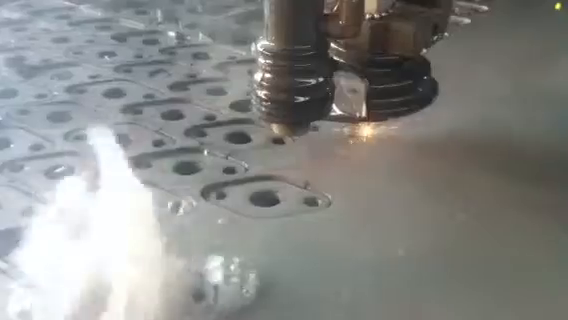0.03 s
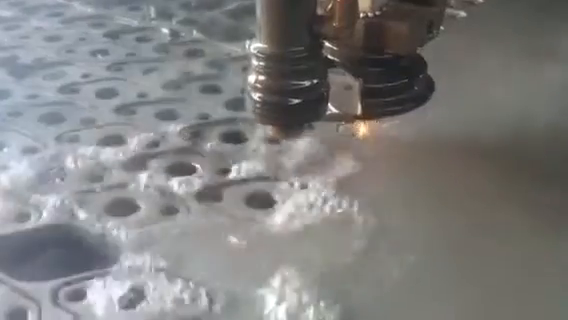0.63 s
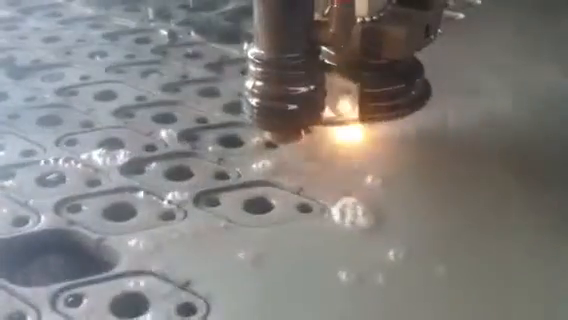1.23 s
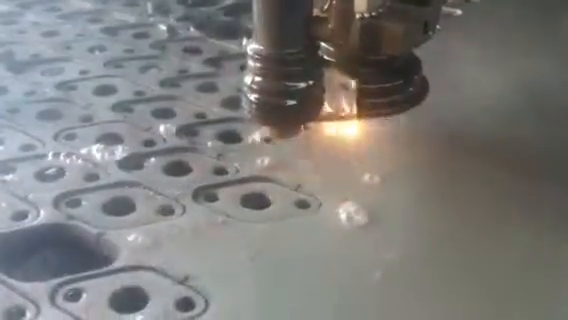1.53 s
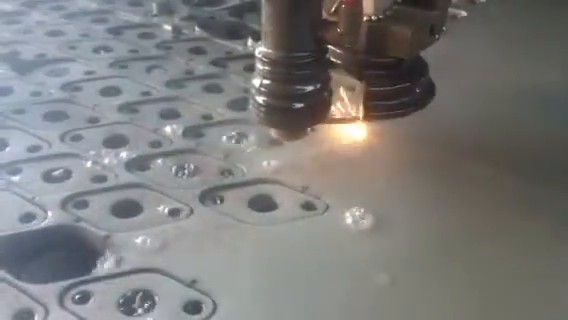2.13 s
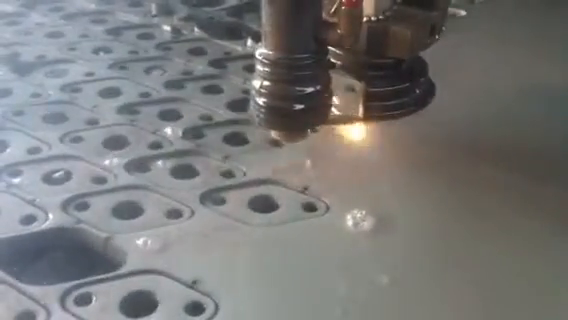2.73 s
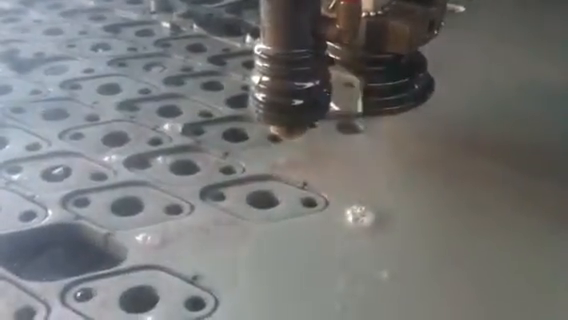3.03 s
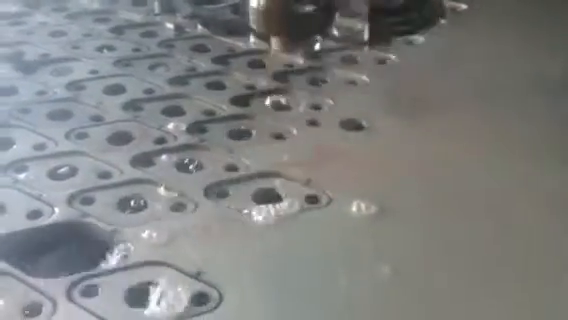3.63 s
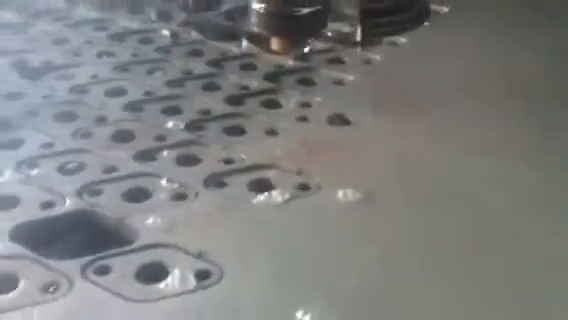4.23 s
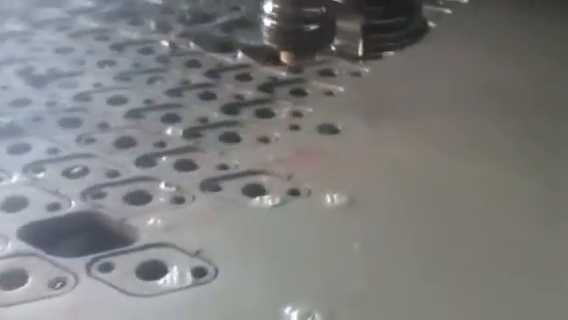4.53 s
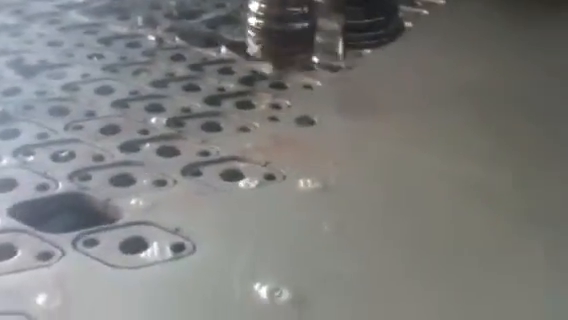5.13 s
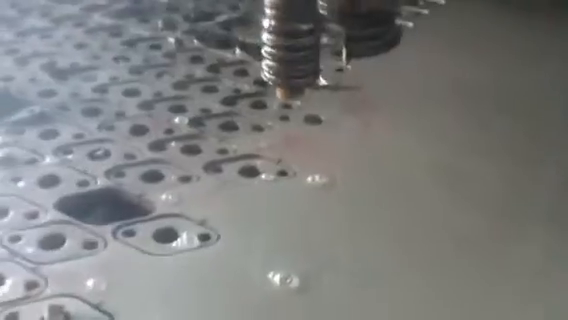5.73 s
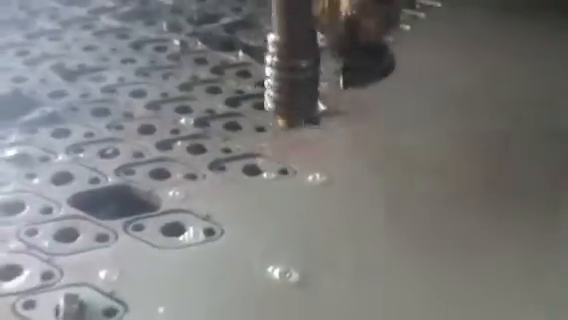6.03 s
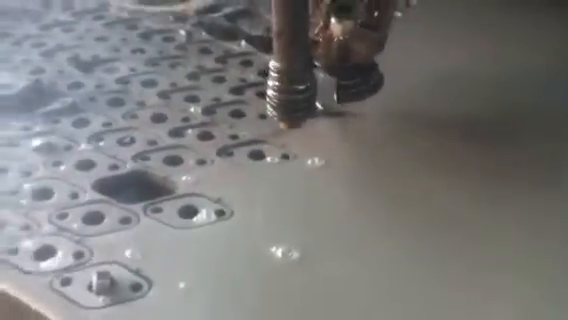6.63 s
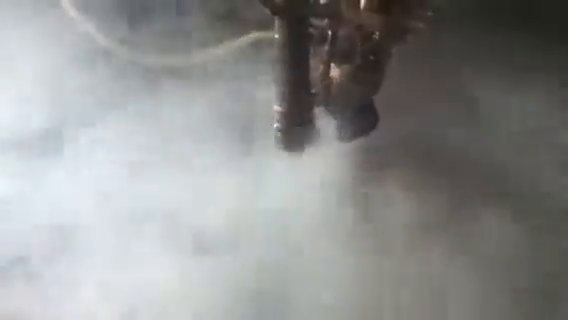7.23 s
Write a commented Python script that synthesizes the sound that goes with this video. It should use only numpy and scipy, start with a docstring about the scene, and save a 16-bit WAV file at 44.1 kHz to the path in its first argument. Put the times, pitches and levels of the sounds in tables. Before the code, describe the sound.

A waterjet hisses harshly through sheet steel while water churns and gurgles around it, heard up close in a workshop. After about three seconds it stops, leaving a much quieter machine hum, soft gas puffs and high whining servos. The cutting head lands with a sharp metallic knock, followed by lighter clunks. Near the end a valve clacks and the jet restarts with a loud, spraying blast.

```python
"""In a workshop, close to one microphone, a cutting jet works through a steel sheet on a water table.
Turbulent gas hisses in the nozzle; collapsing bubbles crackle in the kerf and churn the water.
The jet shuts off, gas puffs out, and the head travels on whining servos over the hum of motors and fans.
It knocks down on the sheet, a valve clacks, and the jet pierces a new hole, throwing water back."""
import sys
import numpy as np
from scipy import signal
from scipy.fft import rfft, irfft
from scipy.io import wavfile
from scipy.ndimage import uniform_filter1d, map_coordinates

SR = 44100
rng = np.random.default_rng(int(sys.argv[2]) if len(sys.argv) > 2 else 0)


def generate_wav(signal):
    """Clip the signal to [-1, 1] and save it as 16-bit WAV at the path in sys.argv[1]."""
    frames = np.transpose(np.atleast_2d(signal))
    scaled = np.clip(frames, -1, 1) * 32767
    pcm = np.round(scaled).astype(np.int16)
    wavfile.write(sys.argv[1], SR, pcm)


N = 329427
T = np.arange(N) / SR
TOP_HZ = 15750  # upper band edge


def undb(db):
    """Amplitude ratio of a level in decibels."""
    return 10 ** (np.asarray(db) / 20)

def unit(x):
    """Normalisation to rms 1."""
    return x / np.sqrt(np.mean(x ** 2))

def curves(rows):
    """Linear interpolation of each column over the times in the first."""
    times, *columns = np.transpose(rows)
    return [np.interp(T, times, column) for column in columns]

def noise():
    """Gaussian white noise."""
    return rng.standard_normal(N)

def walk(rate):
    """Smooth random modulation of rms 1, with about `rate` new values a second."""
    step = max(int(SR / rate), 1)
    held = np.repeat(rng.standard_normal(N // step + 1), step)
    return unit(uniform_filter1d(held, step)[:N])

def colour(x, points, size=4096):
    """Minimum-phase filter through (frequency [Hz], level [dB]) points, falling away above TOP_HZ."""
    hz, db = np.transpose(points)
    f = np.fft.rfftfreq(size, 1 / SR) + 1
    gain = undb(np.interp(np.log(f), np.log(hz), db) - np.clip((f - TOP_HZ) / 20, 0, 40))
    cepstrum = irfft(np.log(gain))[:size // 2]
    cepstrum[1:] *= 2  # folding the cepstrum makes the response causal
    return signal.oaconvolve(x, irfft(np.exp(rfft(cepstrum, size))))[:N]

def split(x, hz, order):
    """Crossover: the bands below and above a frequency, each at rms 1."""
    filters = [signal.butter(order, hz, kind, fs=SR, output="sos") for kind in ("low", "high")]
    return [unit(signal.sosfilt(sos, x)) for sos in filters]

def pops(rate, spread_db):
    """Poisson process of pressure spikes, mostly small, a few large."""
    sizes = undb(spread_db * np.minimum(rng.exponential(size=N), 5))
    return unit((rng.random(N) < rate / SR) * sizes * np.sign(noise()))

def fade(start, decay):
    """Sudden onset and exponential decay."""
    return (T >= start) * np.exp(-np.clip((T - start) / decay, 0, 50))

def swells(rows, attack_s, release_s):
    """Power sum of (start [s], length [s], level [dB]) envelopes that rise, hold and decay."""
    power = 0
    for start, length, db in rows:
        rise = np.clip((T - start) / attack_s, 0, 1)
        fall = np.exp(-np.clip((T - start - length) / release_s, 0, 50))
        power += (undb(db) * rise * fall) ** 2
    return np.sqrt(power)

def tones(partials, waver_db, drift_hz):
    """Sinusoids under slow random amplitude and frequency modulation."""
    out = 0
    for hz, db in partials:
        amplitude = np.sqrt(2) * undb(db + waver_db * walk(6))
        phase = 2 * np.pi * np.cumsum(hz + drift_hz * walk(5)) / SR
        out += amplitude * np.sin(phase)
    return out

def resonances(rows, flicker_db, drift):
    """Randomly driven resonances give narrow noise bands, each wandering in pitch on its own."""
    out = 0
    for hz, width, db in rows:
        phase = 2 * np.pi * np.cumsum(hz * (1 + drift * walk(7))) / SR
        amplitude = undb(db + flicker_db * walk(22))
        out += amplitude * (walk(width) * np.cos(phase) + walk(width) * np.sin(phase))
    return out

def ring(modes, start, contact_s=.0007):
    """Damped modes of a body struck at `start`; neighbouring modes swing in antiphase."""
    t = T[:SR // 2]
    swings = [undb(db - 60 * t / t60) * np.sin(2 * np.pi * hz * t) for hz, db, t60 in modes]
    response = (sum(swings[::2]) - sum(swings[1::2])) * (1 - np.exp(-t / contact_s))
    return np.pad(response, (int(start * SR), N))[:N]

def workshop(x, t60, wet_db):
    """Reverberation: reflections from distant walls add a diffuse, exponentially decaying tail."""
    # spectrum of the tail: (frequency [Hz], level [dB])
    room_spectrum = [(60, -13), (300, -19), (1500, -2.5), (2800, -11.5), (4200, 7), (9000, 12.5),
                     (13000, 5.5), (16000, -1)]
    tail = colour(noise() * fade(.012, t60 / np.log(1000)), room_spectrum)[:SR]
    return x + undb(wet_db) * signal.oaconvolve(x, tail / np.linalg.norm(tail))[:N]

def extraction():
    """Broadband flow noise of fans fills the workshop with a low, even rush."""
    # fan noise: (frequency [Hz], level [dB])
    fan_spectrum = [(18, -78), (30, -57), (98, -18.5), (220, -5.5), (271, -16), (309, -5), (564, -17),
                    (1570, -19), (2790, -32), (3920, -25), (6110, -30), (7540, -32.5), (8160, -29),
                    (9800, -33.5), (15700, -40.5)]
    return unit(colour(noise(), fan_spectrum)) * undb(-47.5 + 0.44 * walk(8.7))

def machine():
    """Periodic forces make motors hum, servos whine and the lift drone; rolling drives add noise."""
    # motor and fan tones: (frequency [Hz], level [dB])
    hum_partials = [(146, -15.5), (193.8, -12), (224.2, -2.5), (299, -13), (312.2, -14.5), (448.4, -19),
                    (672.6, -22), (886, -22), (897, -30)]
    # their joint gain: (time [s], level [dB])
    hum_levels = [(3.1, -51), (3.45, -45.5), (3.6, -42), (4.0, -44.5), (4.6, -41), (6.2, -40.5),
                  (6.78, -39), (6.86, -48)]
    hum = tones(hum_partials, waver_db=1.1, drift_hz=0.675) * undb(curves(hum_levels)[0])

    # moves of the head: (start [s], length [s], rolling level [dB], whine level [dB])
    moves = np.array([(3.214, 0.44, -50, -76), (4.25, 1.1, -54.5, -67.5), (5.115, 0.32, -46.5, -63),
                      (5.603, 1.3, -50.5, -61), (5.965, 0.25, -44.5, -75)])
    roll_gain = swells(moves[:, [0, 1, 2]], attack_s=0.07, release_s=0.15)
    whine_gain = swells(moves[:, [0, 1, 3]], attack_s=0.07, release_s=0.15)
    # rolling noise: (frequency [Hz], level [dB])
    drive_spectrum = [(100, -31), (300, -1), (700, -3), (1100, -6), (1700, -4), (2200, -10), (2700, -17),
                      (5300, -22), (9000, -27), (15000, -39)]
    # resonances of the gearing: (frequency [Hz], bandwidth [Hz], level [dB])
    gear_bands = [(1770, 120, -16.5), (3430, 130, -22.5), (3850, 150, -17.5), (4100, 150, -22.5),
                  (4840, 130, -19.5), (5970, 200, -20)]
    rolling = unit(colour(noise(), drive_spectrum)) + resonances(gear_bands, flicker_db=1.5, drift=.005)
    idle_gain = undb(-61.5)
    rolling *= np.hypot(roll_gain, idle_gain) * undb(0.52 * walk(45))

    # servo carrier tone: (time [s], level [dB])
    carrier_levels = [(3.45, -82), (3.75, -64), (4.9, -60), (6.2, -58), (6.75, -54)]
    carrier = tones([(8000, 0)], waver_db=1.5, drift_hz=.3) * undb(curves(carrier_levels)[0])
    # servo whine: (frequency [Hz], level [dB])
    whine_partials = [(5916, -6), (5997, 0), (6072, -5), (6848, -12)]
    whine = tones(whine_partials, waver_db=1.5, drift_hz=0.63) * whine_gain
    lift = tones([(103, -52.0)], waver_db=0.0, drift_hz=0.75) * np.exp(-((T - 6.38) / 0.14) ** 2)
    return hum + rolling + carrier + whine + lift

def puffs():
    """Soft turbulent noise of gas alone blowing through the idle nozzle."""
    # gas noise: (frequency [Hz], level [dB])
    puff_spectrum = [(1470, -73), (2500, -40), (2960, -22), (3350, -7), (4120, -2.5), (6240, -14.5),
                     (7220, -9), (8290, -14), (9670, -18), (11100, -8.5), (12100, -17), (13700, -11),
                     (15700, -22)]
    # releases of gas: (start [s], length [s], level [dB])
    puff_events = [(3.245, 0.093, -40.5), (3.35, .085, -42), (5.115, .025, -41), (6.67, 0.056, -46)]
    envelope = swells(puff_events, attack_s=0.035, release_s=0.055)
    return unit(colour(noise(), puff_spectrum)) * envelope * undb(0.98 * walk(37))

def knocks():
    """Impacts crack, thud and excite the modes of the head; touching down also rings the sheet."""
    # blows of the head and its valve: (time [s], level [dB], crack decay [s],
    # relative crack level [dB], crack cutoff [Hz], relative thud level [dB])
    blows = [(5.2019, -19, 0.0081, 0.5, 15000, -24), (5.2067, -27, 0.0026, 3, 15000, -20),
             (5.2193, -30, 0.0045, 13, 15000, -16), (6.139, -43, .01, 6, 8000, -10),
             (6.2445, -32.5, 0.0051, 10, 7500, 4), (6.268, -39.5, .007, 8, 5000, -1),
             (6.7683, -21.5, 0.0055, 8.5, 12000, -17), (6.786, -34, 0.0075, 5, 9000, 9),
             (6.7965, -34, 0.0033, 12, 12000, -7)]
    # modes of the head and of the sheet: (frequency [Hz], level [dB], t60 [s])
    head_modes = [(1140, -22, .04), (1377, -2, 0.073), (1510, -5, 0.076), (1815, -1, 0.081),
                  (2480, -15, .04), (3810, 0.5, 0.032), (4660, -15, .02), (6600, -5, 0.051),
                  (8603, -14, 0.022)]
    sheet_modes = [(620, 1, 0.11), (1360, -7, 0.16)]
    # bright and dull parts of the contact noise: (frequency [Hz], level [dB])
    crack_spectrum = [(150, -42), (700, -18), (1300, 13), (2700, -3.5), (4000, -0.5), (7000, 0),
                      (11000, -5.5), (15000, 0)]
    thud_spectrum = [(40, -16), (150, -3), (470, -3), (800, -12), (2000, -32)]
    crack = unit(colour(noise(), crack_spectrum))
    thud = unit(colour(noise(), thud_spectrum))
    out = 0
    for start, db, decay, crack_db, cutoff_hz, thud_db in blows:
        dulled = signal.sosfilt(signal.butter(2, min(cutoff_hz, TOP_HZ), fs=SR, output="sos"), crack)
        contact = undb(crack_db) * dulled * fade(start, decay)
        contact += undb(thud_db) * thud * fade(start, decay=0.0059)
        out += undb(db) * (undb(-1.5) * ring(head_modes, start) + contact)
    return out + undb(-25.5) * ring(sheet_modes, start=5.223)

def bursts(rows, spectrum):
    """Noise with droplet impulses, under envelopes that peak after one swell time and decay."""
    envelope = sum(undb(db) * np.e * (T - start) / swell * fade(start, swell)
                   for start, db, swell in rows)
    return envelope * unit(colour(noise() + 0.39 * pops(rate=900, spread_db=1.5), spectrum))

def splashes():
    """Noise transients: large gas bubbles burst out of the water and the kerf spits spray."""
    # bursting bubbles and spits of spray: (time [s], level [dB], swell time [s])
    gulps = [(.16, -20.5, 0.0094), (.355, -21, 0.013), (.648, -20.5, 0.013), (.848, -21, 0.011),
             (1.62, -18, 0.0048), (1.655, -17.5, 0.0043), (6.884, -22, .005), (7.168, -21, .005)]
    spits = [(.18, -19, 0.011), (.296, -23, .008), (.372, -22, .006), (.79, -22, 0.011), (.858, -22, 0.008),
             (1.041, -18, 0.0027), (6.845, -15.5, 0.014), (6.965, -19, 0.026), (7.035, -21, .018)]
    # their spectra: (frequency [Hz], level [dB])
    gulp_spectrum = [(40, -37), (110, -0.5), (250, 1), (500, -4), (1500, -9), (4000, -13), (9000, -28)]
    spray_spectrum = [(400, -19), (1200, 0), (3500, -0.5), (6000, -0.5), (9000, -3), (15000, -23)]
    return bursts(gulps, gulp_spectrum) + bursts(spits, spray_spectrum)

def bubbles(start, end, per_s=24, low_hz=260, high_hz=853):
    """Bubbles ring as damped oscillators of rising pitch; small ones are higher and quieter."""
    t, out = T[:SR // 10], np.zeros(N + SR)
    for when, smallness, weakness in rng.random((int(per_s * (end - start)), 3)):
        hz = low_hz * (high_hz / low_hz) ** smallness
        age = t * hz / 2.2  # in units of 2.2 cycles
        envelope = undb(-16 - 6.7 * weakness - 3 * smallness) * 2 * np.e * age * np.exp(-2 * age)
        at = int((start + when * (end - start)) * SR)
        out[at:at + len(t)] += envelope * np.sin(2 * np.pi * hz * t * (1 + 0.037 * age))
    return out[:N]

def jet(levels_db, roar_spectrum, gas, crackle, churn_db, flutter_db):
    """Modulated noise in four bands: collapsing bubbles churn and roar, the gas rushes and hisses."""
    water_db, roar_db, rush_db, hiss_db = levels_db
    sputter = walk(170)  # common to roar and rush
    water, roar = split(colour(noise() + crackle, roar_spectrum), hz=408, order=3)
    rush, hiss = split(gas, hz=9500, order=5)
    water *= undb(water_db + churn_db * walk(60))
    roar *= undb(roar_db + 1.5 * sputter)
    rush *= undb(rush_db + flutter_db * sputter)
    hiss *= undb(hiss_db + flutter_db * walk(70))
    return water + roar + rush + hiss

def piercing():
    """An impinging jet throws water back off the sheet and drives the resonances of the pit it digs."""
    on_s, rise_s = 6.809, 0.0013
    # gas in the gap under the nozzle, and the roar below it: (frequency [Hz], level [dB])
    gas_spectrum = [(1470, -35), (2500, -5), (2890, -7), (3350, -1), (4030, -2), (4380, 0), (4960, -3),
                    (5820, -1), (7000, -5), (9170, -3), (10100, -6), (11400, -2), (13900, -5), (15100, -4),
                    (15700, -6)]
    roar_spectrum = [(18, -64), (30, -37), (54, -32), (141, -3.5), (189, 0), (536, -2), (705, -4.5),
                     (910, -3), (1170, -4), (1520, -6.5), (1820, -5.5), (2350, -6), (3060, -32),
                     (5170, -120)]
    spikes = pops(rate=1500, spread_db=4)
    gas = colour(noise() + undb(-8) * spikes, gas_spectrum)

    # hollow ring of the pit, whistle of the opening hole: (frequency [Hz], bandwidth [Hz], level [dB])
    pit_bands = [(1548, 650, -28.5), (3430, 300, -36), (4300, 600, -35), (5700, 800, -35)]
    whistle_bands = [(1080, 54, -27.5), (1514, 200, -28.5)]
    # gain of the pit's ring: (time [s], level [dB])
    pit_levels = [(6.81, -4), (6.95, 3.5), (7.1, -6), (7.3, 0.5), (7.42, 7), (7.47, -1)]
    pit = resonances(pit_bands, flicker_db=0, drift=.015) * undb(curves(pit_levels)[0])
    whistle = resonances(whistle_bands, flicker_db=-0.5, drift=.005) * np.exp(-((T - 7.43) / 0.03) ** 2)

    # water thrown back: (start [s], length [s], level [dB])
    surges = [(6.826, 0.067, -25), (7.022, 0.19, -24.5), (7.268, 0.015, -28.5), (7.32, .012, -36),
              (7.44, 0.017, -25)]
    surge = swells(surges, attack_s=0.009, release_s=0.022)
    calm_water, calm_roar = undb(-52), undb(-31.5)
    water_db = 20 * np.log10(surge + calm_water)
    roar_db = 20 * np.log10(np.hypot(surge * undb(3), calm_roar))
    # the gas overshoots when the valve opens, then settles
    rush_db = -19.5 + 3.5 * fade(on_s, decay=0.25)
    hiss_db = -19.5 + 7.5 * fade(on_s, decay=0.088)
    levels_db = water_db, roar_db, rush_db, hiss_db
    flow = jet(levels_db, roar_spectrum, gas, crackle=undb(-1.5) * spikes, churn_db=0.4, flutter_db=.5)

    # modes of the sheet as the jet strikes it: (frequency [Hz], level [dB], t60 [s])
    strike_modes = [(925, -13.5, 0.051), (420, -27, .04)]
    valve = np.clip((T - on_s) / rise_s, 0, 1)
    return ring(strike_modes, on_s) + valve * (pit + whistle + flow)

def wander(x, drift):
    """The changing gap under the nozzle scales all its resonance frequencies together."""
    position = np.arange(N) + np.cumsum(drift * walk(9))
    return map_coordinates(x, [position], order=3, mode="mirror")

def cutting():
    """Turbulence drives the nozzle gap's resonances, which shift as the jet bites into fresh metal."""
    bite_s, off_s, off_decay_s = 1.05, 3.009, 0.0048
    # gas over the open kerf, gas on metal, and the kerf's roar: (frequency [Hz], level [dB])
    open_spectrum = [(1470, -38), (2500, -8), (4350, -6), (5520, -7), (6340, -11), (7330, -8), (9750, -7),
                     (10900, 0), (11400, -1), (12100, -5), (13600, 1), (15100, -4), (15700, -7)]
    biting_spectrum = [(1470, -34), (2500, -4), (3370, -4), (4250, -3), (6390, -7), (7680, -3), (9380, -9),
                       (11100, -4), (12400, -7), (12900, -1), (13500, 0), (15100, -4), (15700, -6)]
    roar_spectrum = [(18, -64), (30, -43), (48, -39), (134, -4), (189, -0.5), (294, -0.5), (379, -2),
                     (632, -3), (705, -4), (2350, -8), (3060, -38), (5170, -120)]
    spikes = pops(rate=1500, spread_db=4)
    turbulence = noise() + undb(-7) * spikes
    open_gas = unit(colour(turbulence, open_spectrum))
    biting_gas = unit(colour(turbulence, biting_spectrum))
    bite = np.clip((T - bite_s) / 0.016, 0, 1)
    gas = wander((1 - bite) * open_gas + bite * biting_gas, drift=.009)

    # effort along the cut: (time [s], water level [dB], roar level [dB], rush level [dB])
    cut_levels = [(0, -28, -25, -20), (.18, -32, -26.5, -18.5), (.38, -30.5, -27.5, -18.5),
                  (.45, -36, -31, -22.5), (.62, -37.5, -29, -22), (.8, -32, -25, -19),
                  (.95, -36, -30, -19.5), (1.02, -26, -25.5, -20.5), (1.07, -27, -23, -23.5),
                  (1.2, -25, -19.5, -20), (1.38, -25.5, -19.5, -22), (1.56, -25.5, -24, -23),
                  (2.15, -25.5, -24.5, -22.5), (2.62, -26.5, -20, -20), (2.96, -27.5, -18.3, -18.5),
                  (3.005, -34, -20.5, -20)]
    water_db, roar_db, rush_db = curves(cut_levels)
    # the hiss holds its level over the open kerf; in metal it follows the rush
    hiss_db = (1 - bite) * -18.5 + bite * (rush_db + 1.5)
    slosh, gust = walk(33.97), walk(29.95)
    levels_db = (water_db + 1.2 * slosh, roar_db + 0.74 * slosh,
                 rush_db + 0.37 * gust, hiss_db + 0.28 * gust)
    bubbling = bubbles(bite_s, off_s)
    flow = jet(levels_db, roar_spectrum, gas, crackle=undb(-1) * spikes, churn_db=2.0, flutter_db=1.0)
    valve = np.exp(-np.clip((T - off_s) / off_decay_s, 0, 50))
    return valve * (bubbling + flow)

def scene():
    """Superposition of all sources at one microphone, alike in both channels."""
    flow = workshop(splashes() + cutting() + piercing() + puffs(), t60=0.92, wet_db=-23)
    impacts = workshop(knocks(), t60=0.51, wet_db=-13.5)
    mono = flow + impacts + machine() + extraction()
    return np.array([mono, mono])

def record(dry):
    """The microphone notches the treble and thins the bass; the recorder saturates and cuts the top."""
    dip_hz, dip_width_hz, low_hz, ceiling = 12400, 200, 42, .85
    heard = signal.lfilter(*signal.iirnotch(dip_hz, dip_hz / dip_width_hz, fs=SR), dry)
    heard = signal.sosfilt(signal.butter(2, low_hz, "high", fs=SR, output="sos"), heard)
    rounded = ceiling * np.tanh(heard / ceiling)
    return signal.sosfilt(signal.ellip(12, .1, 80, TOP_HZ, fs=SR, output="sos"), rounded)


dry = scene()
out = record(dry)
generate_wav(out)
```